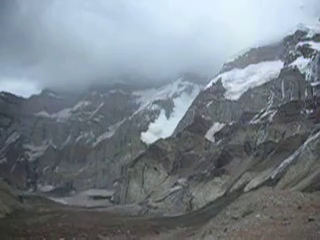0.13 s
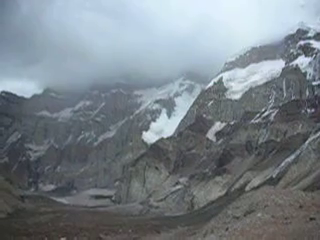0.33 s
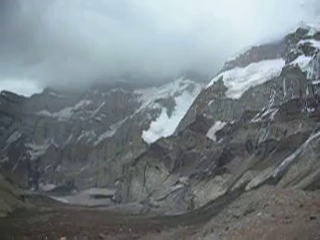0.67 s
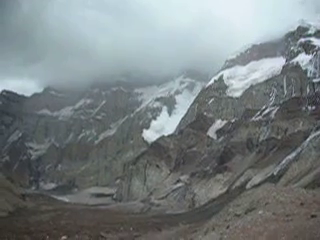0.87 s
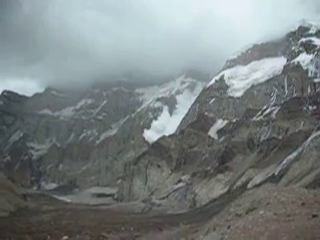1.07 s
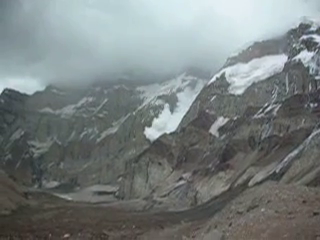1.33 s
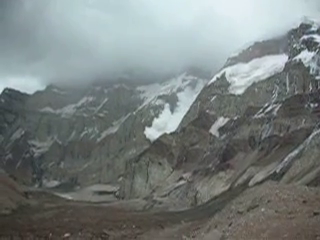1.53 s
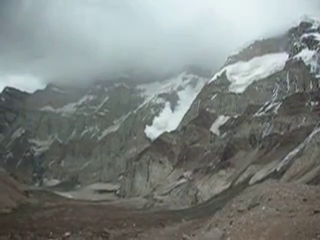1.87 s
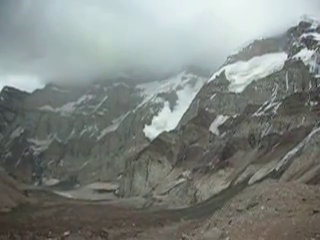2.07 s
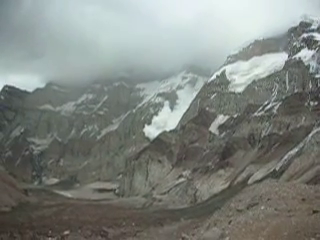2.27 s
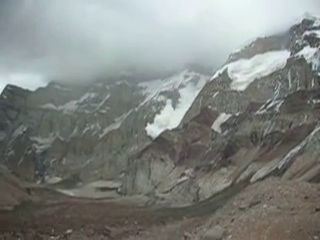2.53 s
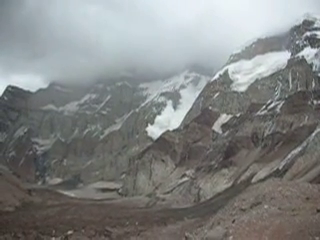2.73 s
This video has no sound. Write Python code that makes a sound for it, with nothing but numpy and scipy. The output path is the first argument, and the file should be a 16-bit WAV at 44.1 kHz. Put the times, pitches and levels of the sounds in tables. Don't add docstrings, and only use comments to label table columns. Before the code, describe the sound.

A distant avalanche roars softly and steadily, dull and mid-low, barely swelling over three seconds in an open mountain valley. Sound cuts in abruptly near 0.07 s with strong low wind thumps until about 0.3 s. A faint click comes at 0.75 s, a low wind knock around 1.0, softer ones at 2.0 to 2.3, and a higher knock at 2.65. Cheap microphone, muffled highs, grainy hiss.

```python
import sys
import numpy as np
from scipy import signal
from scipy.io import wavfile
from scipy.ndimage import uniform_filter1d

SR = 44100
rng = np.random.default_rng(int(sys.argv[2]) if len(sys.argv) > 2 else 0)


def field_ratio(decibels):
    return 10 ** (np.asarray(decibels, dtype=float) / 20)


def dump_mix(stems):
    frames = np.atleast_2d(stems).T
    limited = np.clip(frames, -1, 1)
    pcm = np.round(limited * 32767).astype(np.int16)
    wavfile.write(sys.argv[1], SR, pcm)


N = 127449


def evened(x):
    return x / np.sqrt(np.mean(x ** 2) + 1e-20)


def follow(curve):
    time_s, value = np.transpose(curve)
    return np.interp(np.arange(N) / SR, time_s, value)


def add(mix, start_s, sound):
    part = mix[round(start_s * SR):][:len(sound)]
    part += sound[:len(part)]


def noise(colour, patch_db, flicker_db):
    frames = N // 256 + 5
    hz = np.fft.rfftfreq(1024, 1 / SR)
    real, imaginary, patches = rng.standard_normal((frames, 513, 3)).T
    patches = uniform_filter1d(patches, size=10, axis=0)
    patches = evened(uniform_filter1d(patches, size=10, axis=1))
    flicker = evened(uniform_filter1d(rng.standard_normal(frames), size=4))
    colour_hz, colour_db = np.transpose(colour)
    level_db = np.interp(np.log(hz + 1), np.log(colour_hz + 1), colour_db)[:, None]
    level_db = level_db + patch_db * patches + flicker_db * flicker
    spectra = (real + 1j * imaginary) * field_ratio(level_db) * (hz < 5000)[:, None]
    return evened(signal.istft(spectra, nperseg=1024, noverlap=768)[1][:N])


# pitch_hz, level_db (per Hz)
ROAR_COLOUR = [(20, -12), (150, -10.5), (300, -2), (500, 1), (750, -3), (1100, -6.5), (1600, -11),
               (3800, -15.5)]
# time_s, level_db
SLIDE_LEVEL = [(.1, -49), (.5, -47.5), (.9, -49), (1.25, -48), (1.45, -48.5), (1.65, -47.5), (1.85, -49),
               (2.2, -48.5), (2.7, -47.5), (2.88, -46.5)]


def slide():
    lift_db, patch_db, flicker_db = 2, 0.54, 0.66
    return field_ratio(follow(SLIDE_LEVEL) + lift_db) * noise(ROAR_COLOUR, patch_db, flicker_db)


# pitch_hz, level_db (per Hz)
WIND_COLOUR = [(20, -12), (60, -4.5), (120, 0), (200, -3.5), (320, -17), (600, -46.5)]
# time_s, level_db
GUST_LEVEL = [(.07, -39.5), (.2, -41.5), (.33, -46.5), (.4, -56.5), (.52, -50), (.68, -55), (.88, -62.5),
              (.95, -50.5), (1.08, -47), (1.15, -56.5), (1.6, -69.5), (1.97, -61), (2.04, -50), (2.17, -60),
              (2.24, -49.5), (2.5, -58), (2.72, -54), (2.89, -53.5)]


def wind():
    patch_db, lump_db = 1.7, 1.5
    return field_ratio(follow(GUST_LEVEL)) * noise(WIND_COLOUR, patch_db, lump_db)


# start_s, peak_db, pitch_hz, ring_s (time to fall by 60 dB)
THUMP_EVENTS = [(0.071, -31.5, 187.6, 0.012), (.0742, -16.5, 141.3, .16), (.082, -24.5, 205.5, .07),
                (0.09, -24, 114.5, 0.11), (0.1242, -18, 117.4, .12), (0.1332, -26, 200, 0.079),
                (.147, -26.5, 100.8, 0.069), (0.248, -33.5, 170.4, 0.053), (0.258, -30, 195.3, 0.036),
                (.306, -35.5, 138.4, 0.034), (0.317, -36, 119.3, 0.057), (.449, -39.5, 118.5, 0.036),
                (.497, -44, 102, 0.057), (0.937, -37.5, 170.7, 0.051), (.951, -36.5, 110.5, 0.052),
                (1.038, -36.5, 140.3, 0.043), (1.056, -41, 186, 0.034), (2.051, -42, 138.3, .04),
                (2.208, -39.5, 134, 0.033)]


def thump(start_s, peak_db, pitch_hz, ring_s):
    rise_cycles, sag_per_s, skew = 0.49, 3.5, 2.2
    upper_ratio, upper_db, upper_ring = 1.55, -8, 0.8
    t = np.arange(8000) / SR
    turn = 2 * np.pi * pitch_hz * (t - sag_per_s * t ** 2 / 2)
    rise = np.sin(np.pi / 2 * np.minimum(t * pitch_hz / rise_cycles, 1))
    shape = rise * field_ratio(-60 * t / ring_s)
    swing = field_ratio(peak_db) * shape / np.max(shape)
    upper = field_ratio(upper_db - 60 * t / (ring_s * upper_ring)) * np.sin(upper_ratio * turn)
    sharper = skew * swing * np.cos(2 * turn)
    return start_s, swing * (-np.sin(turn) - upper + sharper)


# start_s, peak_db, final_pitch_hz
KNOCK_EVENTS = [
    (0.2882, -28, 109.6),
    (0.9927, -29.5, 115),
    (2.023, -34, 100.8),
    (2.190, -33, 153),
    (2.2658, -38, 110.4),
    (2.6476, -30.5, 229),
]


def knock(start_s, peak_db, pitch_hz):
    drop, drop_cycles, peak_cycles = 1.8, 0.38, 0.62
    cycles = np.arange(3000) / SR * pitch_hz
    extra_cycles = drop * drop_cycles * (1 - np.exp(-cycles / drop_cycles))
    turn = 2 * np.pi * (cycles + extra_cycles)
    swell = (cycles / peak_cycles * np.exp(1 - cycles / peak_cycles)) ** 2
    return start_s, -field_ratio(peak_db) * swell * np.sin(turn)


# middle_s, peak_db, pitch_hz, half_length_s
TICK_EVENTS = [
    (.7527, -34, 3400, .0007),
]


def tick(middle_s, peak_db, pitch_hz, half_length_s):
    t = np.arange(-200, 200) / SR
    swell = np.exp(-(t / half_length_s) ** 2)
    return middle_s - 200 / SR, field_ratio(peak_db) * swell * np.cos(2 * np.pi * pitch_hz * t)


def scene():
    mix = slide() + wind()
    for event in THUMP_EVENTS:
        add(mix, *thump(*event))
    for event in KNOCK_EVENTS:
        add(mix, *knock(*event))
    add(mix, *tick(*TICK_EVENTS[0]))
    return mix[None]


def band_limit(x):
    return signal.sosfilt(signal.butter(12, 16000, fs=SR, output="sos"), x)


def record(dry):
    hiss_db, offset = -60, -0.0506
    up, down, edge_hz = 28, 5, 3870
    step = 1 / 128 / np.sqrt(2)
    start_sample = 3200
    heard = dry + field_ratio(hiss_db) * rng.standard_normal(dry.shape) + offset
    slow = signal.resample_poly(heard, down, up, axis=1, padtype="edge")
    steps = step * np.round(slow / step)
    smooth = signal.firwin(28 * up + 1, edge_hz, window=("kaiser", 9), fs=SR * down)
    fast = signal.resample_poly(steps, up, down, axis=1, window=smooth, padtype="edge")[:, :N]
    mix = fast * (np.arange(N) >= start_sample)
    return band_limit(mix)


dry = scene()
out = record(dry)
dump_mix(out)
```